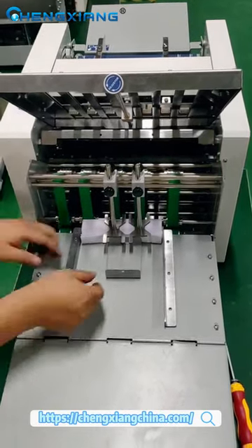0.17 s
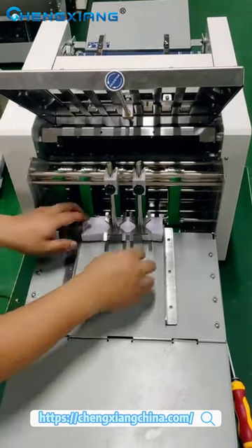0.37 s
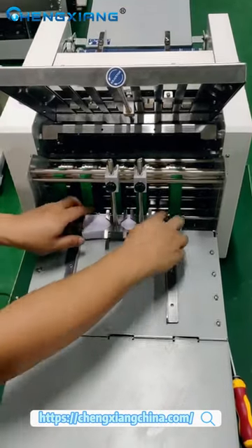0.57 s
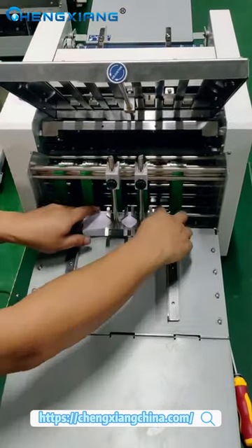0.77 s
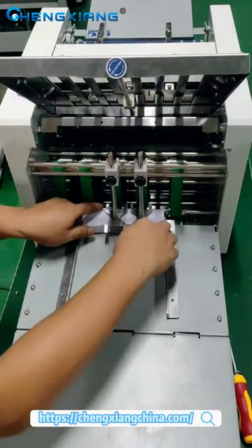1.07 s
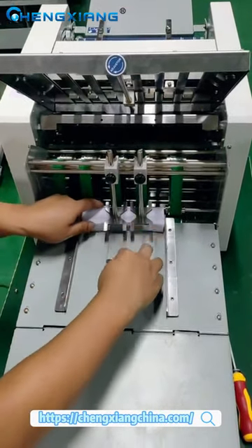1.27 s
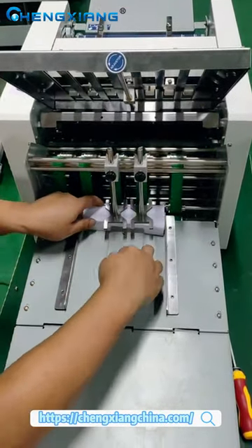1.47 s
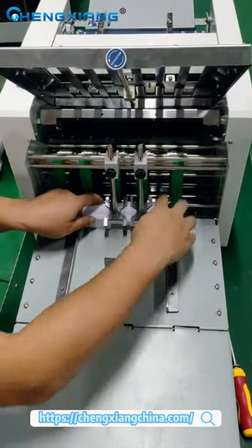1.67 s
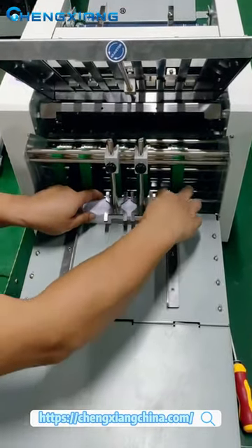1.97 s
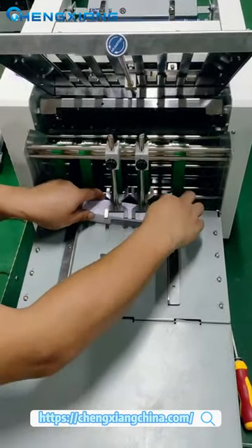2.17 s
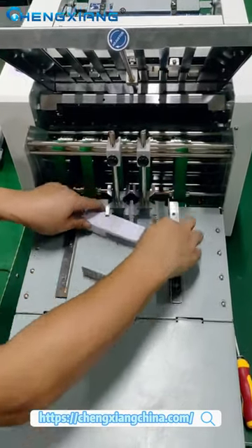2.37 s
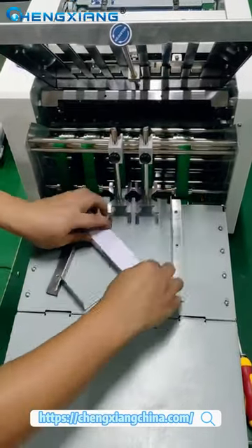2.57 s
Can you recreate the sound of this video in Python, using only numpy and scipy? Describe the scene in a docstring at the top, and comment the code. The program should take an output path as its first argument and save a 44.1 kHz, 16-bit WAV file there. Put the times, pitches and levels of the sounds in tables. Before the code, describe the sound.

The steady hum of a paper folding machine fills a workshop, along with its fan and a high hiss. Late on, a folded sheet swishes out, and a small metal bar lands on the steel table with a sharp click.

```python
"""First you hear a steady hum, a fan and an airy hiss: a paper folding machine is switched on.
The hum comes from mains power and the motor, and the fan rumbles inside the housing.
Hands slide a folded sheet out of its guides with one short swish and rub it over the steel table.
Last, a small metal bar clicks down on the table, which thumps and rings briefly into the workshop."""
import sys
import numpy as np
from scipy import signal
from scipy.fft import rfft, irfft
from scipy.io import wavfile
from scipy.ndimage import uniform_filter1d

SR = 44100
rng = np.random.default_rng(int(sys.argv[2]) if len(sys.argv) > 2 else 0)


def int16_out(signal):
    """Quantize to a 16-bit WAV file."""
    q = np.round(np.clip(np.atleast_2d(signal).T, -1, 1) * 32767)
    wavfile.write(sys.argv[1], SR, q.astype(np.int16))


N = 119070
T = np.arange(N) / SR


def gain(db):
    """Turn decibels (dB) into a number to multiply by."""
    return 10 ** (np.asarray(db) / 20)


def normalize(x):
    """Scale to an average strength (rms) of 1."""
    return x / np.sqrt(np.mean(x ** 2))


def noise(shape):
    """Noise made stronger or weaker at each pitch by (Hz, dB) points."""
    hz, db = np.array(shape).T
    freqs = np.maximum(np.arange(N // 2 + 1) * SR / N, 1)
    curve = gain(np.interp(np.log(freqs), np.log(hz), db))
    return normalize(irfft(rfft(rng.standard_normal(N)) * curve, N))


def resonance(hz, width):
    """Noise gathered around one pitch."""
    freqs = np.arange(N // 2 + 1) * SR / N
    return normalize(irfft(rfft(rng.standard_normal(N)) / (1 + ((freqs - hz) / width) ** 2), N))


def wander(rate):
    """A smooth random curve that changes about rate times a second."""
    hold = max(int(SR / rate), 1)
    steps = np.repeat(rng.standard_normal(N // hold + 2), hold)
    smooth = uniform_filter1d(uniform_filter1d(steps, hold), hold)[:N]
    return normalize(smooth - smooth.mean())


def lowpass(x, hz):
    """Steeply cut the sound above hz."""
    return signal.sosfilt(signal.ellip(10, .2, 70, hz, fs=SR, output="sos"), x)


def tone(hz, waver, lead_cycles):
    """A tone that wavers in strength and timing."""
    phase = 2 * np.pi * (hz * T + lead_cycles)
    strength = 1 + waver * wander(rate=5.05)
    slip = waver * wander(rate=5.05)
    return np.sqrt(2) * (strength * np.sin(phase) + slip * np.cos(phase))


# The tones of the hum. Each row: multiple of the lowest pitch, base level in dB, waver (0 is steady).
HUM_TONES = [(1, -71, 0.36), (2, -63.5, 0.28), (3, -43, 0.1), (4, -50.5, 0.16), (5, -51.5, 0.032),
             (6, -69, 0.22), (7, -60, 0.061), (8, -81, 0.35), (10, -74.5, 0.71), (11, -75.5, 0.45),
             (17, -79.5, 0.37), (18, -87, 0.33)]
# Drift in the hum. Each row: time in seconds, then dB added to multiples 4, 5 and 7.
HUM_DRIFT = [(0, 1.5, -2.5, 2), (.25, 1, -1.5, 7), (.8, -0.5, -1, 0.5), (1.5, 3, 0, 1.5),
             (2.25, 0.5, 0, -0.5), (2.38, 2.5, -2, 1), (2.46, -1, -11.5, 5.5), (2.56, -3, 0, 1.5),
             (2.63, -10, -2.5, 3), (2.7, -4.5, 2, 4)]

def mains_hum(lowest_hz=100.06, stagger_cycles=1 / 6):
    """Mains power buzzes in the housing; its tones are staggered, so they drone more than pulse."""
    times, *curves = np.array(HUM_DRIFT).T
    drift_db = {k: np.interp(T, times, curve) for k, curve in zip((4, 5, 7), curves)}
    start_cycles = rng.random()
    hum = 0
    for multiple, db, waver in HUM_TONES:
        lead = multiple * start_cycles + multiple % 2 * stagger_cycles
        hum += gain(db + drift_db.get(multiple, 0)) * tone(multiple * lowest_hz, waver, lead)
    return hum


# The motor's tones. Each row: pitch in Hz, level in dB, waver (0 is steady).
MOTOR_TONES = [(209, -56.5, 0.32), (210.4, -58, 0.44), (244.6, -62, 0.38)]

def motor():
    """The running motor adds low, wavering tones of its own."""
    return sum(gain(db) * tone(hz, waver, rng.random()) for hz, db, waver in MOTOR_TONES)


# Fan and motor resonances. Each row: pitch in Hz, width in Hz, level in dB.
FAN_RESONANCES = [(147.4, 3.9, -66), (197.6, 8.3, -60.5), (1043, 50, -70.5), (1300, 32, -73),
                  (1694, 12, -74.5), (2057, 18, -70.5)]
# The fan's rumble. Each row: pitch in Hz, relative level in dB.
RUMBLE_SHAPE = [(25, -34), (60, -29.5), (85, -25.5), (115, -20), (145, -5.5), (168, -10.5), (200, 0.5),
                (235, -8.5), (275, -3.5), (320, -1), (360, -15), (420, -6.5), (480, -15), (570, -17),
                (650, -14.5), (720, -12.5), (790, -20), (860, -16), (930, -21), (1050, -19), (1200, -23.5),
                (1700, -22), (2500, -26), (3200, -29), (6000, -34.5)]

def fan(rumble_db=-49.5):
    """The fan rumbles in the housing, with unsteady tones on top."""
    tones = sum(gain(db) * resonance(hz, width) for hz, width, db in FAN_RESONANCES)
    return tones + gain(rumble_db) * noise(RUMBLE_SHAPE)


# The hiss's tone color. Each row: pitch in Hz, relative level in dB.
HISS_SHAPE = [(1000, -49), (3200, -13.5), (3800, 0), (4400, -3), (5500, 2.5), (6400, 0), (7000, -1),
              (8000, 2), (9000, -3), (10200, -2.5), (11000, -6.5), (12000, -9)]
# Its loudness. Each row: time in seconds, level in dB.
HISS_LOUDNESS = [(0, -54.5), (.06, -54), (.11, -57), (.2, -55), (1.0, -54.5), (1.35, -54.7), (1.65, -57),
                 (1.72, -56.5), (1.8, -55.5), (1.87, -56), (1.95, -54), (2.12, -60.5), (2.25, -56),
                 (2.7, -59.5)]

def airy_hiss():
    """A high, airy hiss flutters slightly and rises and falls in loudness."""
    level_db = np.interp(T, *np.array(HISS_LOUDNESS).T)
    flutter_db = .45 * wander(rate=16)
    return gain(level_db + flutter_db) * noise(HISS_SHAPE)


def swell(start, rise, fall):
    """A rounded rise and fall in loudness, timed in seconds."""
    return np.sin(np.pi / 2 * np.interp(T, [start, start + rise, start + rise + fall], [0, 1, 0])) ** 2


# Hand strokes. Each row: start, rise and fall in seconds, level in dB.
HAND_STROKES = [(.115, .03, 0.052, -55), (.95, 0.036, 0.041, -57), (1.23, 0.046, .05, -61),
                (1.95, 0.09, 0.053, -46.5), (2.24, 0.2, 0.49, -53)]
# Paper on steel. Each row: pitch in Hz, relative level in dB.
RUB_SHAPE = [(200, -20), (800, 1), (2000, -9.5), (3200, -16), (4000, -3.5), (6400, 0.5), (8200, -1),
             (10000, -3.5), (12000, -11.5)]

def paper_rub(grain_db=1.5):
    """Friction between the sheet and the steel makes a grainy swish with each stroke."""
    rub = normalize(noise(RUB_SHAPE) * gain(grain_db * wander(rate=900)))
    effort = sum(gain(db) * swell(start, rise, fall) for start, rise, fall, db in HAND_STROKES)
    return effort * rub


# The folded sheet's resonances. Each row: pitch in Hz, width in Hz, relative level in dB.
FOLD_RESONANCES = [(1345, 120, -1.5), (2460, 440, -7.5)]

def paper_fold(level_db=-50.7):
    """The fold resounds as the sheet leaves the guides."""
    fold = normalize(sum(gain(db) * resonance(hz, width) for hz, width, db in FOLD_RESONANCES))
    return gain(level_db) * swell(start=1.972, rise=.047, fall=.058) * fold


def fade(age, fade_s):
    """Die away after a hit; the fade time is how long it takes to drop 60 dB."""
    return (age > 0) * np.exp(-np.log(1000) * age / fade_s)


def onset(age, rise_s):
    """Climb quickly from silence after a hit."""
    return 1 - np.exp(-age / rise_s)


def ring(notes, age):
    """The fading notes of something struck age seconds ago."""
    return sum(gain(db) * fade(age, fade_s) * np.sin(2 * np.pi * hz * age) for hz, db, fade_s in notes)


# The bar's hits on the table. Each row: start in seconds, relative level in dB.
BAR_HITS = [(2.5372, 0), (2.5388, -8), (2.5492, -22)]
# The bar's ring. Each row: pitch in Hz, base level in dB, fade time in seconds.
BAR_NOTES = [(4520, -31, .014), (4950, -29, .012), (6005, -30, .021), (6420, -28.5, .021),
             (7070, -41, .022), (7600, -40, .022), (7920, -37, .018), (8870, -34, .022), (10600, -45, .012)]
# The crack of a hit. Each row: pitch in Hz, relative level in dB.
CRACK_SHAPE = [(300, -8.5), (3600, -11), (5000, -1.5), (9000, 0), (12000, -11), (13000, -19)]

def bar_click(crack_db=-22.5):
    """The bar lands in three quick hits, each a crack and a short ring."""
    crack = gain(crack_db) * noise(CRACK_SHAPE)
    click = 0
    for start, db in BAR_HITS:
        age = np.maximum(T - start, 0)
        hit = ring(BAR_NOTES, age) + crack * fade(age, fade_s=.0086)
        click += gain(db) * hit * onset(age, rise_s=.00012)
    return click


# The table's ring. Each row: pitch in Hz, level in dB, fade time in seconds.
TABLE_NOTES = [(314, -26, 0.05), (410, -37, 0.035), (520, -38, .03), (1077, -43, .054), (1314, -46, 0.07),
               (1556, -35.5, 0.08), (1970, -46, .06), (2229, -38.5, 0.05), (3063, -45, 0.045),
               (3900, -47, 0.03)]

def table_thump(age):
    """The struck steel table shakes and rings briefly."""
    return ring(TABLE_NOTES, age) * onset(age, rise_s=.0021)


# The room's echo. Each row: pitch in Hz, relative level in dB.
ECHO_SHAPE = [(300, -6), (700, 7.5), (1600, 5.5), (2500, 3), (3600, -1.5), (6000, 3.5), (9000, 0),
              (12000, -12.5)]
NOISE_TOP_HZ = 11950

def room_echo(age, level_db=-39):
    """The room answers the click with a short wash of noise."""
    wash = lowpass(noise(ECHO_SHAPE), NOISE_TOP_HZ)
    return gain(level_db) * wash * fade(age, fade_s=.2) * onset(age, rise_s=.003)


def scene():
    """Machine, paper and bar together, the same in both ears."""
    hum = mains_hum() + motor()
    air_and_paper = lowpass(fan() + airy_hiss() + paper_rub() + paper_fold(), NOISE_TOP_HZ)
    since_hit = np.maximum(T - BAR_HITS[0][0], 0)
    landing = bar_click() + table_thump(since_hit) + room_echo(since_hit)
    bass_cut = signal.butter(2, 220, "highpass", fs=SR, output="sos")  # the thin tabletop gives no bass
    return np.tile(hum + air_and_paper + signal.sosfilt(bass_cut, landing), (2, 1))


def record(dry):
    """Take away the very highest treble."""
    return lowpass(dry, hz=12750)


dry = scene()
out = record(dry)
int16_out(out)
```